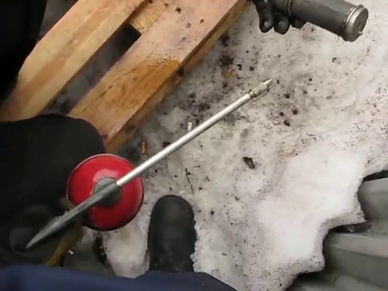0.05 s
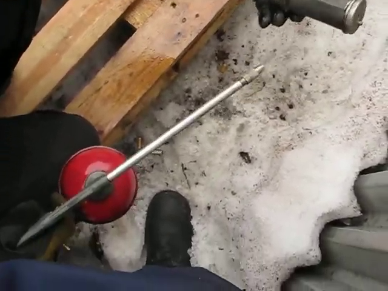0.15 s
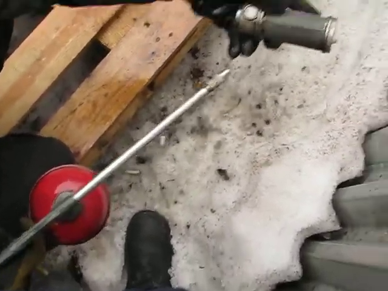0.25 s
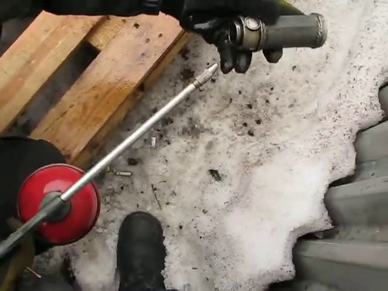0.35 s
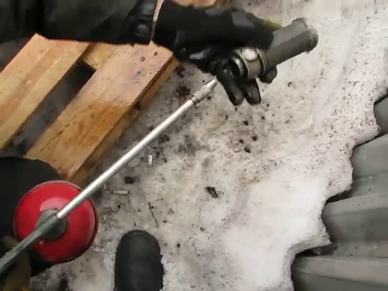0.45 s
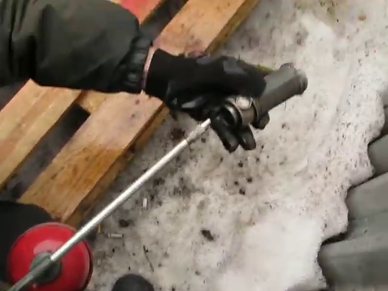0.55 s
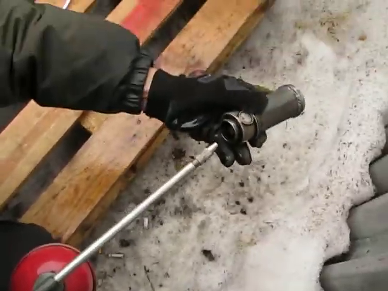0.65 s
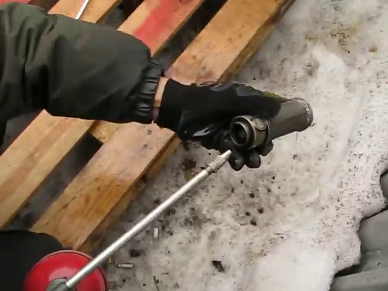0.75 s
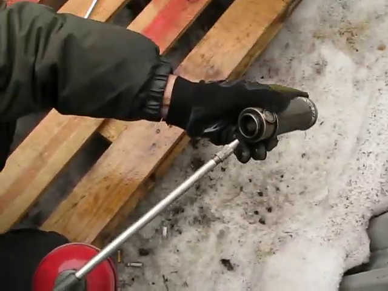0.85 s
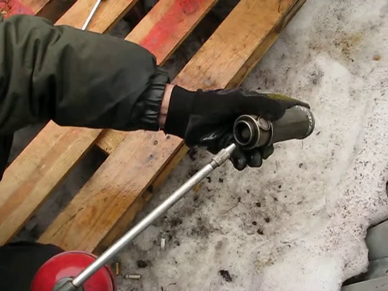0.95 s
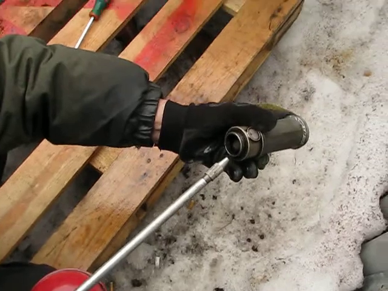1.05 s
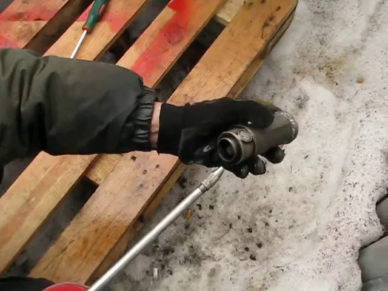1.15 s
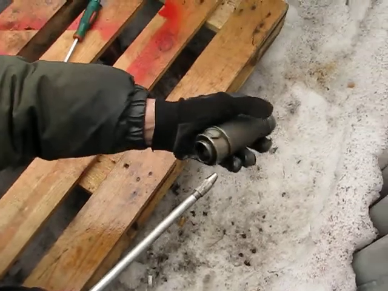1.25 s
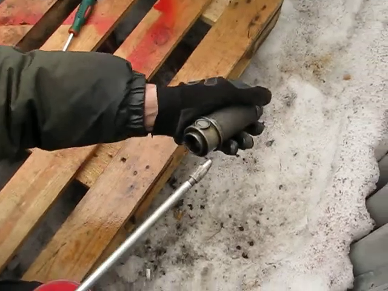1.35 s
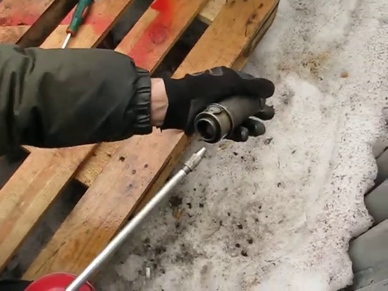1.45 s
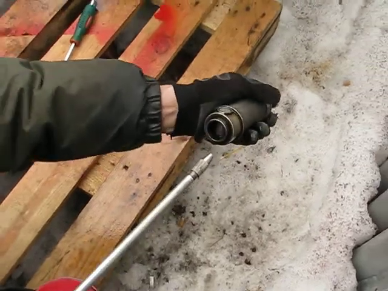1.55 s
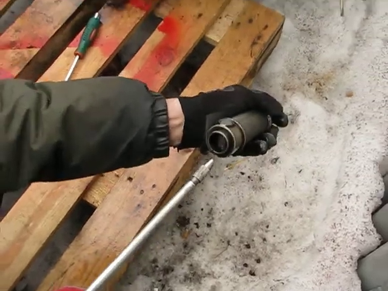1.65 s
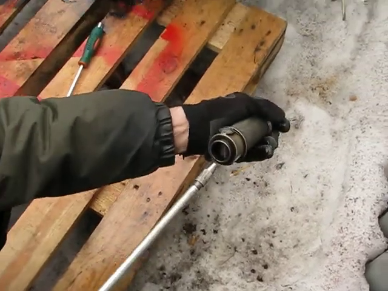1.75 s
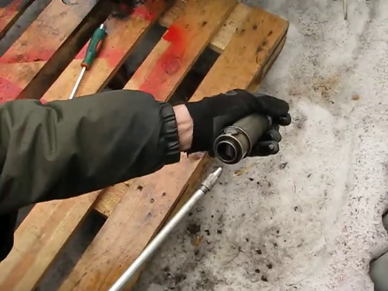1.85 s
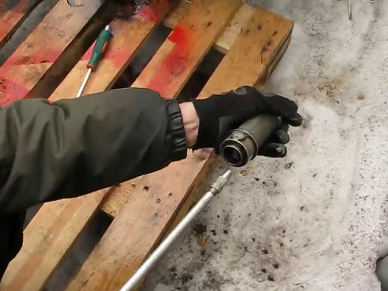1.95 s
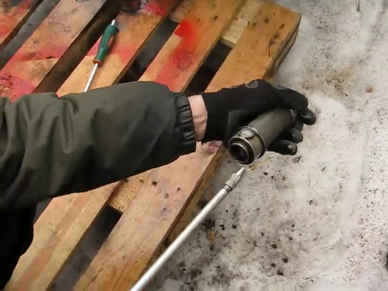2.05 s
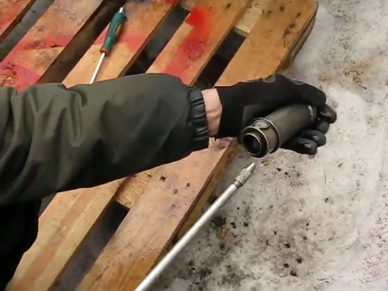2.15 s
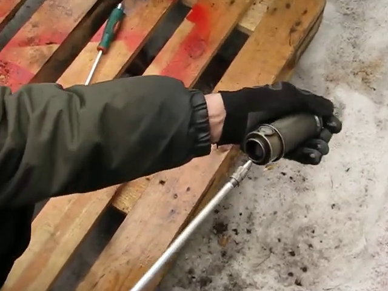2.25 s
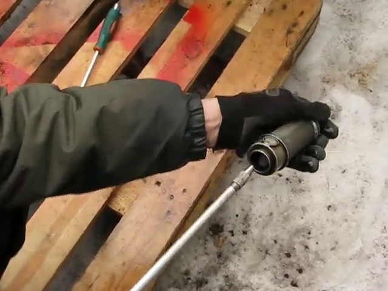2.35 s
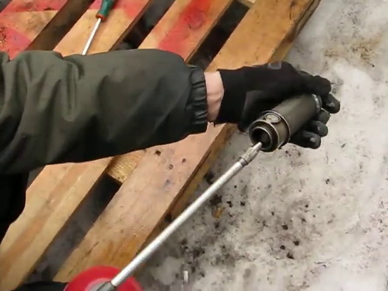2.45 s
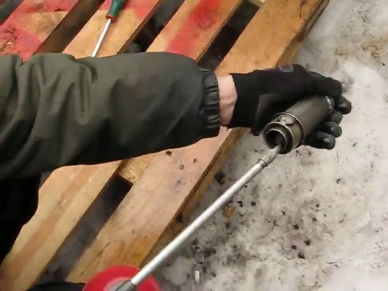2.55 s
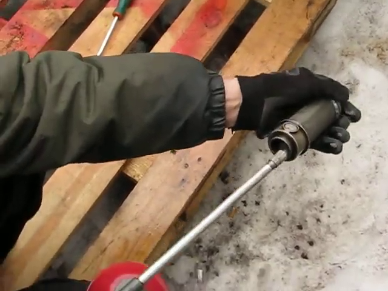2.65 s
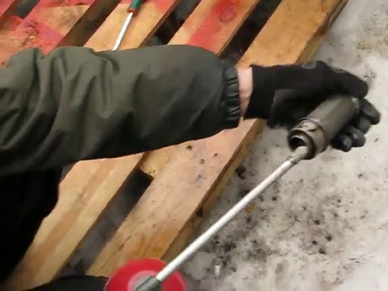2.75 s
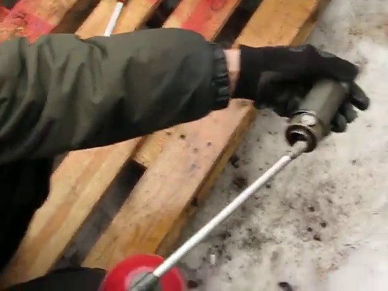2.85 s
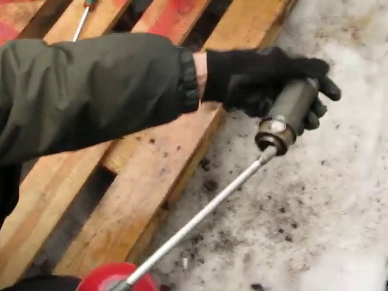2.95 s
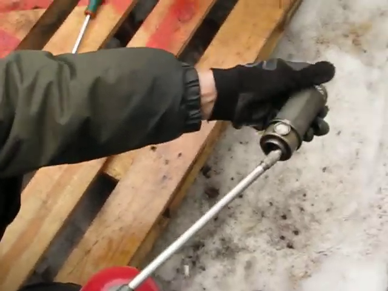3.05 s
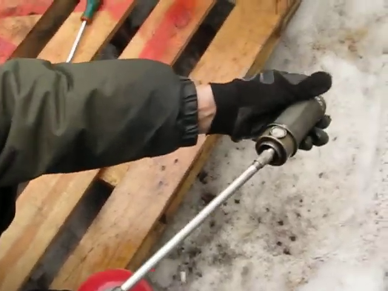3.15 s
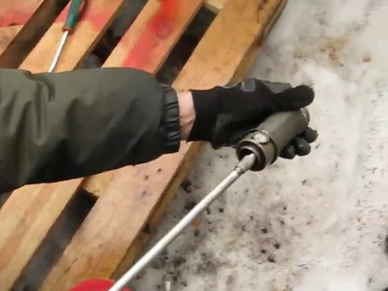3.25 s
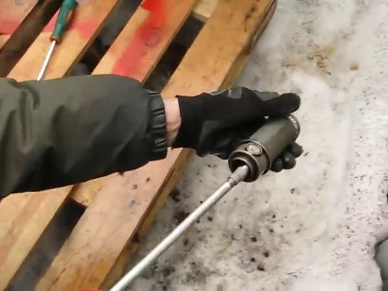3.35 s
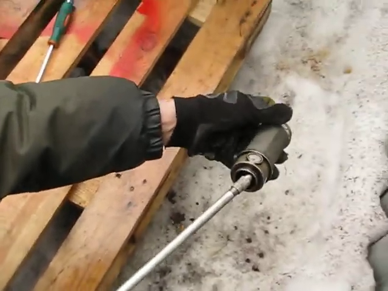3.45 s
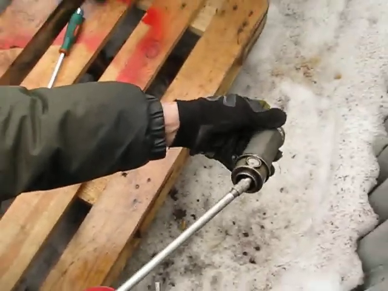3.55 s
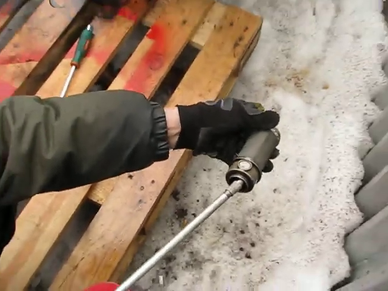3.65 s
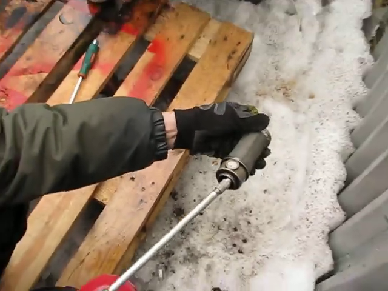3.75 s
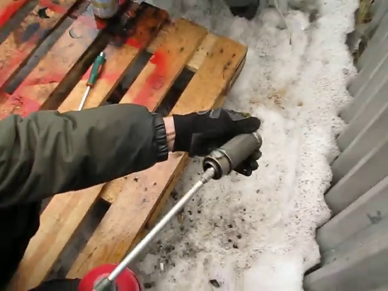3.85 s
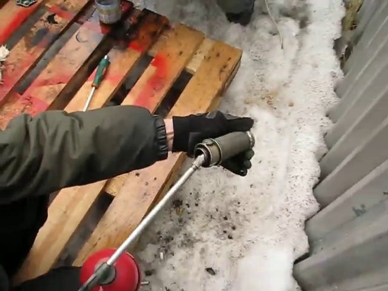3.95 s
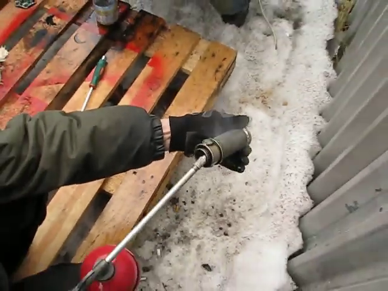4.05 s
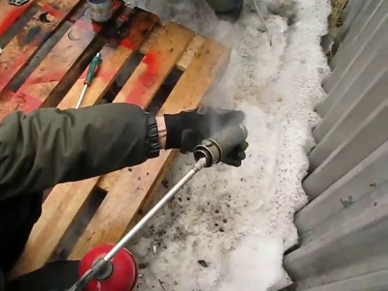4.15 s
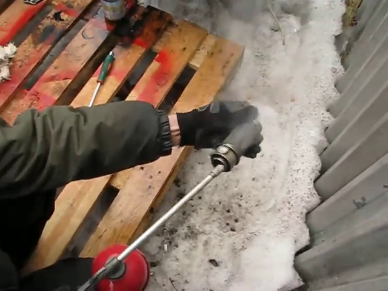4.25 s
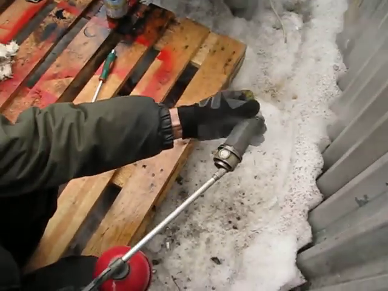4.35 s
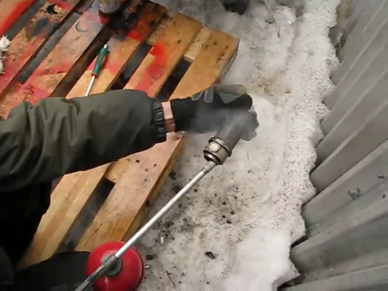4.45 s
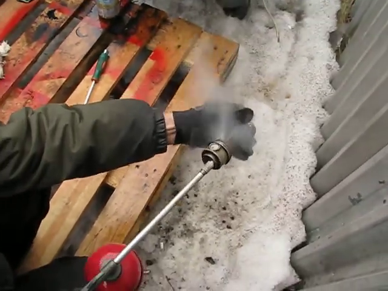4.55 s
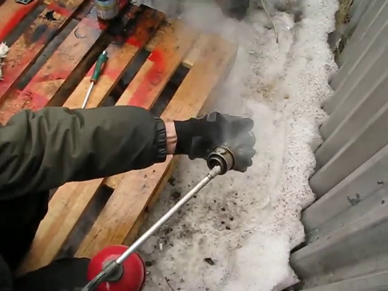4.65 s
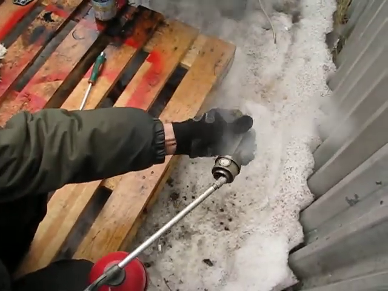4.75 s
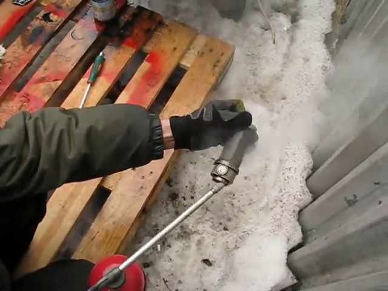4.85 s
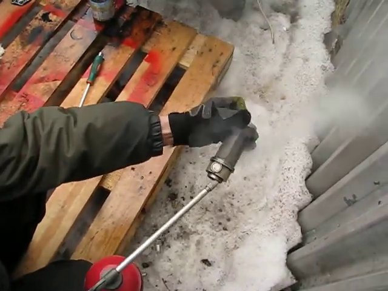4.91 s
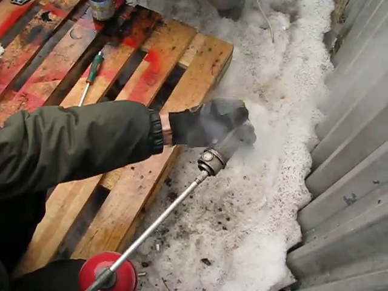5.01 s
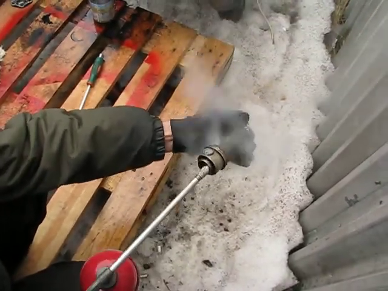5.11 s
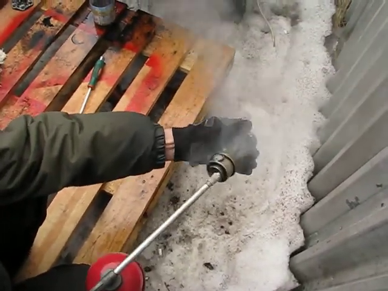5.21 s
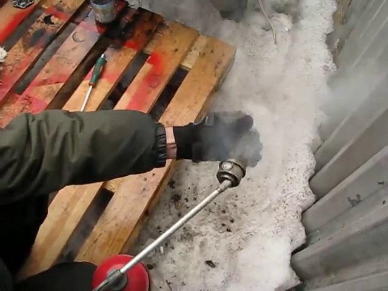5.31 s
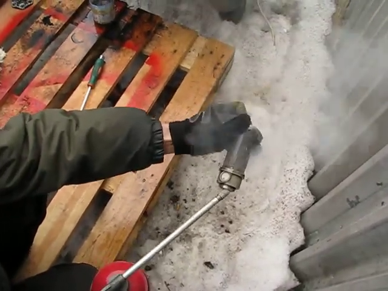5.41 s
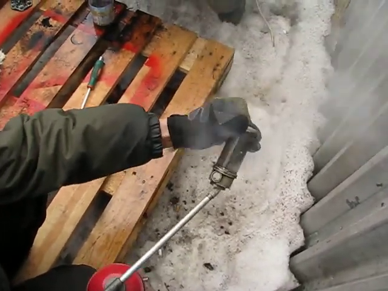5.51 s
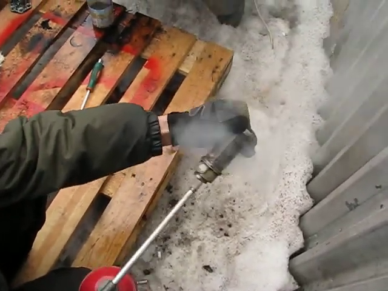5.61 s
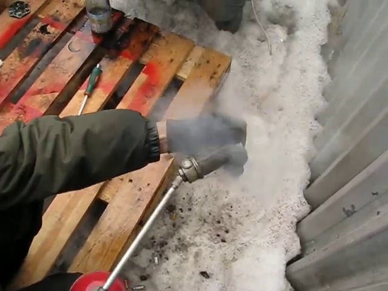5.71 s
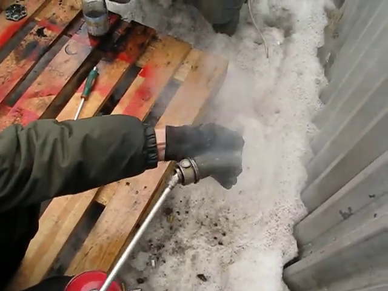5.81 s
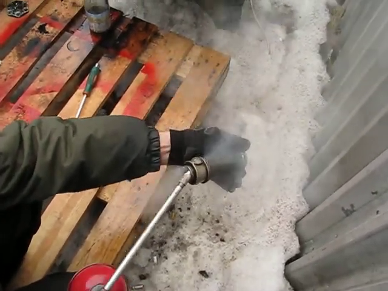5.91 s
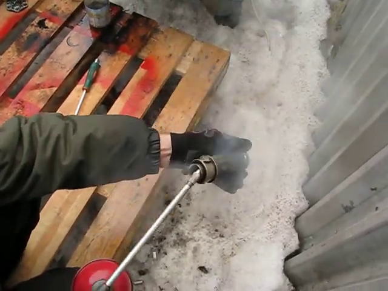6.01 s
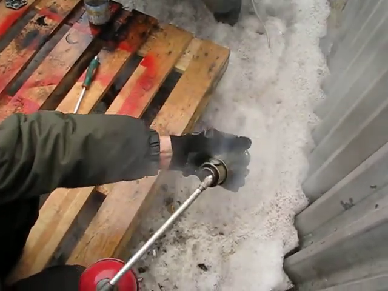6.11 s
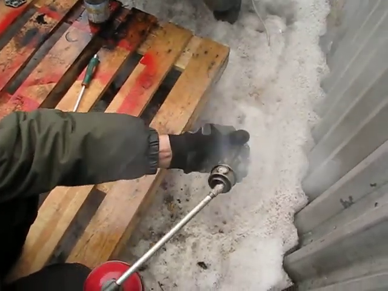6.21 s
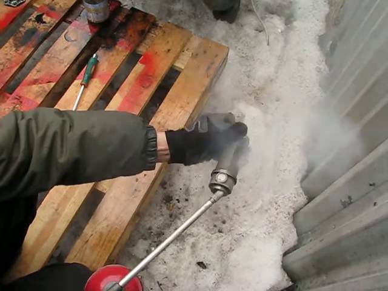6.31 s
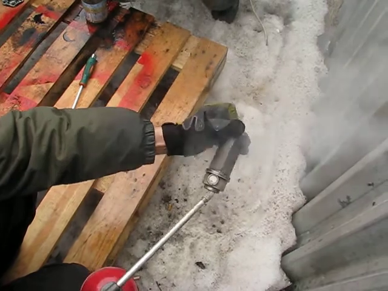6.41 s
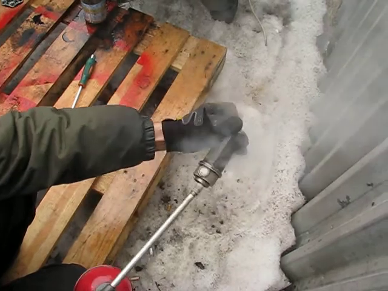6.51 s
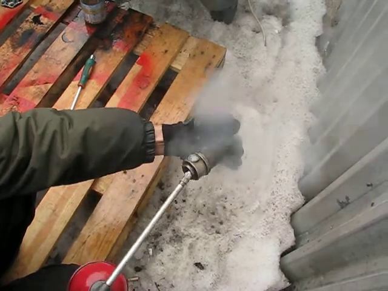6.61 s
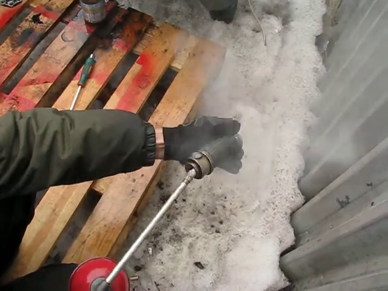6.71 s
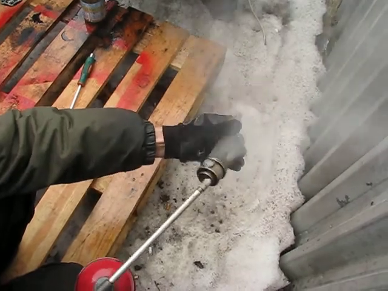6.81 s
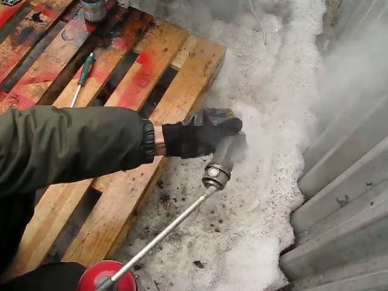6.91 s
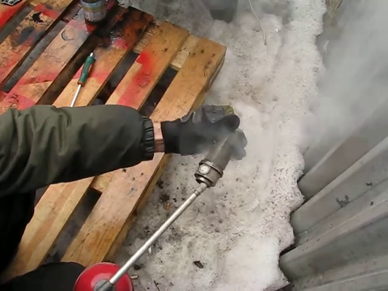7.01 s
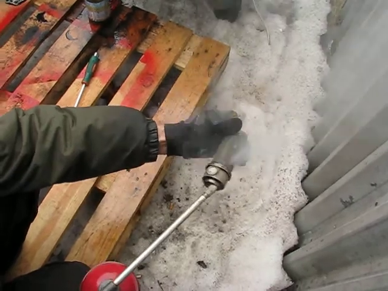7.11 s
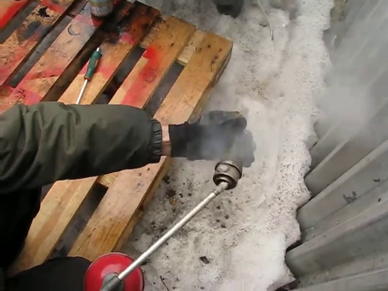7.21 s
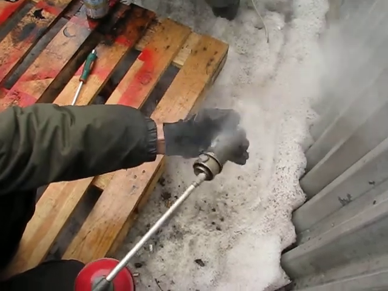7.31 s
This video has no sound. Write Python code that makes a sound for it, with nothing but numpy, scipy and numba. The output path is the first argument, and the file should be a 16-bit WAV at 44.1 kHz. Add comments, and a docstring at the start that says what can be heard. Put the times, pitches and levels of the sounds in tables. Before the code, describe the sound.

Gloved handling knocks and scrapes a hollow metal filter over a faint chugging machine, then a loud pressurised spray hisses in shifting, ringing passes.

```python
"""Outdoors, a far machine chugs over a distant roar and hum, and the background level rises over the first
seconds. A gloved hand fits a spray wand into a hollow metal filter: dragged grains rub, decaying modes knock,
grit scrapes. At 4 s the valve opens: shaped noise hisses and the background level drops under it. Pass after
pass, as the filter is turned, the stream fills the cavity until drifting resonances ring, then slips off the
rim."""
import sys
import numpy as np
from scipy import signal
from scipy.fft import rfft, irfft
from scipy.io import wavfile
from scipy.ndimage import uniform_filter1d, map_coordinates
from numba import njit

SR = 44100
rng = np.random.default_rng(int(sys.argv[2]) if len(sys.argv) > 2 else 0)


def master_out(mix):
    """Clip the mix to full scale and print it as 16-bit PCM to the path in sys.argv[1]."""
    frames = np.transpose(np.atleast_2d(mix))
    ceiling = np.clip(frames, -1, 1)
    pcm = np.round(ceiling * 32767).astype(np.int16)
    wavfile.write(sys.argv[1], SR, pcm)


N = 325017

# Tone of the distant roar: pitch_hz, density_db (per Hz, relative)
ROAR_SPECTRUM = [(15, -31), (25, -9.5), (64, -3), (256, -5.5), (840, 0), (1020, 1), (1650, -4.5),
                 (1940, -7), (3720, -23), (4490, -22), (7310, -21.5), (8140, -29), (14800, -36),
                 (16000, -36)]
# Level of the yard before the jet, ahead of a 3 dB lift of the roar: time_s, level_db
YARD_LEVEL = [(0.0, -61), (0.3, -58.5), (1.3, -53.5), (2.1, -48.5), (2.16, -54), (2.5, -50), (3.06, -48),
              (3.7, -47), (4.01, -43.5)]
# Likeness of the two ports for the yard: pitch_hz, likeness (0-1)
YARD_LIKENESS = [(60, 0.99), (130, 1), (290, 0.94), (640, 0.89), (1410, 0.67), (3100, 0.33), (6820, 0.25),
                 (15000, 0.36)]
# Tone of sleeves rustling: pitch_hz, density_db (per Hz, relative)
RUSTLE_SPECTRUM = [(1500, -2), (3500, 6), (6500, 0), (11000, -2), (16500, -7.5)]
# Level of the hum, rising and then dropping: time_s, level_db
HUM_LEVEL = [(0, -75), (.74, -72), (.93, -67), (1.45, -63), (1.68, -64), (2.06, -58), (2.2, -75),
             (2.34, -60), (3.1, -61), (4.0, -55), (4.08, -76)]
# Tone of the machine's puffs: pitch_hz, density_db (per Hz, relative)
CHUG_SPECTRUM = [(300, -6), (1200, -1.5), (2100, -2), (2500, -0.5), (3100, -2), (3600, -5.5), (4300, -5),
                 (5200, -29), (7000, -35)]
# Small ticks in each stroke: delay_s, pitch_hz, width_hz, level_db (relative to the stroke)
STROKE_TICKS = [(0.001, 4500, 350, 3), (.019, 3200, 400, 2)]
# Glove and sleeve dragging over metal and cloth: start_s, end_s, level_db, centre_hz
RUB_EVENTS = [(0, 0.06, -59.5, 7000), (0.084, 0.188, -53.5, 7500), (0.599, 0.793, -62, 7000),
              (1.1, 1.17, -55.5, 7000), (1.252, 1.344, -56.5, 6960), (1.435, 1.663, -53.5, 6470),
              (1.74, 1.84, -62, 4000), (1.818, 1.877, -45, 5060), (1.866, 1.932, -43.5, 5600),
              (1.961, 2, -47.5, 5000), (2.305, 2.37, -56.5, 3500), (2.554, 2.607, -43.5, 3830),
              (2.615, 2.662, -53, 3300), (2.923, 3.087, -57.5, 6500), (3.145, 3.184, -46, 4500),
              (3.188, 3.237, -49.5, 5000), (3.349, 3.426, -55, 6500), (3.435, 3.536, -52, 7300),
              (3.84, 3.886, -45.5, 7000)]
# Modes of the metal filter when knocked: pitch_hz, level_db (relative)
FILTER_MODES = [(250, -18), (440, -8), (640, 0.5), (800, -0.5), (950, -3.5), (1180, 3.5), (1300, 0),
                (1500, 1.5), (1900, -2), (2270, 1.5), (2600, 1), (3100, -2.5), (3800, -3), (4600, -2)]
# Metal on metal in a damping glove: start_s, peak_db (before pan), centre_hz, focus_db_per_octave,
# pan_db (left minus right)
KNOCK_EVENTS = [(.5645, -27.5, 1000, 1, -8), (0.584, -30, 900, 7, -3), (.63, -29, 1880, 22, 2),
                (.665, -38, 1200, 8, -6), (1.932, -12.5, 2265, 29, -3), (1.935, -29, 640, 23, 0),
                (1.98, -23, 2210, 7, -3), (2.034, -22, 2620, 8, -3), (2.1122, -10.5, 1130, 7, -4),
                (2.118, -7, 1474, 8.5, -10), (2.119, -11, 780, 11.5, -12.5), (2.126, -15, 1000, 6, -11),
                (2.257, -30.5, 1620, 1, -1.5), (2.373, -27.5, 662, 38, 1), (2.375, -32.5, 2260, 29, -3),
                (2.615, -40, 255, 29, -.8), (2.75, -27.5, 686, 10, -3), (2.763, -20.5, 1196, 5, -6),
                (2.897, -17.5, 1105, -0.5, -8), (3.116, -12.5, 1180, 12, -6.5), (3.116, -16, 2390, 18, -1),
                (3.15, -39, 248, 22, 1), (3.155, -21, 1258, 7, -5), (3.196, -24, 3000, 2.5, -4),
                (3.342, -39, 2600, 20, 3), (3.414, -31, 2700, 14, 6), (3.926, -21.5, 1150, 8, -3),
                (3.927, -28, 3030, 27, 0)]
# Gritty scrapes and ticks: start_s, peak_db (before pan), centre_hz, pan_db (left minus right)
SCRAPE_EVENTS = [(0.5641, -40, 3510, -6), (0.604, -44, 4620, 2.5), (0.629, -29.5, 4900, 7),
                 (.648, -35, 9500, 0.1), (1.9308, -14, 4370, 0), (1.9814, -29, 3560, 4),
                 (2.0342, -23, 3800, 0), (2.0694, -34, 4400, 0.1), (2.116, -16.5, 4000, -4),
                 (2.15, -35, 4800, 1.1), (2.372, -29.5, 3300, 2.1), (2.5446, -12, 4500, 2.1),
                 (2.5527, -13.5, 4370, -4), (2.6047, -18, 3200, -1), (2.6143, -24, 4600, 5),
                 (2.7627, -36, 3400, -8), (2.898, -33, 3270, -10), (3.1156, -29, 3150, -8),
                 (3.144, -23, 4210, 0.1), (3.154, -18, 2600, 0), (3.192, -29, 3000, -3),
                 (3.853, -23.5, 7470, -0.4), (3.927, -24, 3000, -2.1)]
# Tone of the free jet: pitch_hz, density_db (per Hz, relative)
HISS_SPECTRUM = [(900, -35), (2000, -7.5), (4000, -1), (7000, 2.5), (11000, 1.5), (14000, 3), (15900, -2.1)]
# Tone of the stream's wash: pitch_hz, density_db (per Hz, relative)
WASH_SPECTRUM = [(24, -60), (40, -27), (261, -7.5), (378, -5.5), (407, -5.5), (445, -4.5), (565, -3.5),
                 (870, -3), (1400, -3.5), (1820, -11), (3080, -120)]
# Resonances of the blown filter: pitch_hz, width_hz (nominal), level_db (relative)
LOW_CAVITY_MODES = [(1716, 530, -3), (2627, 630, 1), (3155, 490, -5.5)]
MID_CAVITY_MODES = [(3537, 82, -2), (4234, 460, 9.5), (5280, 250, -5)]
NOZZLE_MODES = [(6420, 2000, -6.5), (7340, 880, 6.5), (8280, 560, 3.5), (8750, 250, 0.5),
                (13200, 1000, -30)]
# Likeness of the two ports for the jet: pitch_hz, likeness (0-1)
JET_LIKENESS = [(100, 0.07), (640, 0.1), (1400, 0.41), (3100, 0.67), (5000, 0.65), (8000, 0.47),
                (11000, 0.34), (15000, 1)]
# Balance of the jet: pitch_hz, pan_db (left minus right)
JET_BALANCE = [(60, 0), (110, 1), (200, 0.5), (380, -1.5), (700, 0), (1290, -1), (2380, -2), (4400, -0.5),
               (8120, -0.5), (15000, 0)]
# Echoes of the hiss off pallet, ground and fence: delay_ms, drift_ms (as the hands move), level_db
HISS_ECHOES = [(.5, 0.066, -5.5), (1.3, 0.11, -6.5), (3.1, .25, -3)]
# Passes of the stream over the filter: low_fullest_s, mid_fullest_s, jet_db, then relative to jet_db
# and ahead of fixed trims wash_db, low_db, mid_db (cavities at fullest), nozzle_db;
# nozzle_end (pitch ratio at the end of the pass)
STREAM_PASSES = [(4.309, 4.22, -21.5, -11, -0.5, -4, -1, 0.99),
                 (4.88, 4.72, -21.5, -14, 0.5, -2.3, -0.1, 1.08),
                 (5.42, 5.36, -22, -12.5, 0.3, -2.5, 2.1, 1.04),
                 (5.77, 5.75, -21.5, -14, -2.1, -3, 3, 1.14),
                 (6.39, 6.21, -21.5, -17, -1, -2.2, -1.3, 1.08),
                 (6.97, 6.9, -21.5, -12.5, 0.3, -2.5, 1, 1.06),
                 (7.11, 7.12, -21.5, -11.5, -3, -9, -0.5, 1.26),
                 (7.31, 7.3, -20.5, -12.5, -2.2, -7, -1.5, 1.1)]
# The stream slips off the rim between passes: leaves_s, off_s,
# return_s (may overlap off_s where the slip is brief), wash_loss_db (negative)
RIM_SLIPS = [(4.375, 4.477, 4.4, -4.5), (4.933, 4.99, 5.1, -6.5), (5.433, 5.477, 5.7, -12),
             (5.8, 5.907, 5.94, -11), (6.407, 6.53, 6.58, -17), (7.014, 7.023, 7.045, -7),
             (7.168, 7.216, 7.17, -6)]

HUM_HZ, HUM_WAVER_DB, DRONE_HZ, DRONE_DB = 51.5, 2.2, 235, -4.5
UNDER_JET_DB = -61.5  # yard level once the valve is open, ahead of the roar's lift
RUSTLE_DB, RUSTLE_RISE = -61, 0.25  # at the start; dB per dB of yard swell

CHUG_COUNT, CHUG_FIRST_S, CHUG_PERIOD_S = 13, .044, .1384
CHUG_LIMP_S = .011  # every fourth stroke is late
CHUG_DB, CHUG_SLOPE_DB_PER_S, CHUG_SCATTER_DB = 10.5, -4, 1.5  # relative to the rising yard level
CHUG_DECAY_S, TICK_DECAY_S = 0.053, .006
CHUG_BED_DB, CHUG_BED_FADE_S = -3.5, 0.55  # hiss between strokes, growing to the last and then dying

RUB_WIDTH = 2.05  # in centres at 6 kHz, narrower for duller rubs
KNOCK_T60_S, T60_PER_FOCUS_S = 0.028, 0.00058  # at 1 kHz; a purer blow is gripped less and rings longer
CONTACT_MS, SOFT_HZ = 1, 900  # blows centred under SOFT_HZ are padded, longer pushes
SCRAPE_WIDTH, SCRAPE_T60_S = 2.04, 0.041  # width in centres at 4.5 kHz, narrower for duller grit

VALVE_S, VALVE_RISE_S, SPURT_DB, SPURT_S = 4.0228, .0025, 4.5, .01
PORT_LAG_MS, PORT_DRIFT_MS = .006, .011
RETURN_DB_PER_S = 121
HISS_LOSS = 0.24  # dB lost by the whole jet per dB of lost wash
LOW_LOSS, MID_LOSS, NOZZLE_LOSS = 0.05, 1, 0.55  # on top of that, per dB of lost wash
LOW_SWELL_DB, LOW_RISE_S, LOW_FALL_S = 7, .12, 0.056
MID_SWELL_DB, MID_RISE_S, MID_FALL_S = 3.5, 0.13, 0.16
NOZZLE_FADE_DB = -3  # over one pass
MID_SHARP, MID_SAG = .02, 0.052  # pitch ratios; the middle cavity sags as the low one swells
TOP_HZ = 15750


def undb(db):
    """Decibels to amplitude."""
    return 10 ** (np.asarray(db) / 20)


def unit(x):
    """Scale to rms 1."""
    return x / np.sqrt(np.mean(x ** 2))


def on_hz(table, hz):
    """A (pitch_hz, value) table read on a log-frequency axis."""
    f, v = np.transpose(table)
    return np.interp(np.log(np.maximum(hz, 1)), np.log(np.maximum(f, 1)), v)


def in_time(table):
    """A (time_s, level_db) curve, one value per sample."""
    s, level = np.transpose(table)
    return np.interp(np.arange(N) / SR, s, level)


def walk(rate):
    """Random levels held 1 / rate s and slewed twice; spread near 1."""
    k = int(SR / rate)
    steps = np.repeat(rng.standard_normal(N // k + 1), k)
    return 1.567 * uniform_filter1d(uniform_filter1d(steps, k), k)[:N]


@njit
def svf(x, hz, width):
    """State-variable band-pass with a moving centre, gain 1 there."""
    y, band, low = np.empty(len(x)), 0., 0.
    for i in range(len(x)):
        g, k = np.tan(np.pi * hz[i] / SR), width / hz[i]
        v = (band + g * (x[i] - low)) / (1 + g * (g + k))
        band, low, y[i] = 2 * v - band, low + 2 * g * v, k * v
    return y


def steep_band(x, hz, width):
    """Two band-passes in a row on each channel."""
    return np.array([svf(svf(c, hz, width), hz, width) for c in x])


def pair(alike, pan=((1, 0), (2, 0))):
    """White noise for two microphone ports, with their likeness and balance by frequency."""
    hz = np.arange(N // 2 + 1) * SR / N
    likeness = np.clip(on_hz(alike, hz), 0, 1)
    mid, side = rfft(rng.standard_normal((2, N))) * np.sqrt([1 + likeness, 1 - likeness])
    skew = undb(on_hz(pan, hz) / 2)
    return irfft([(mid + side) * skew, (mid - side) / skew], N)


def colour(x, spectrum):
    """Shape by a (pitch_hz, density_db) spectrum; rms 1."""
    gain = undb(on_hz(spectrum, np.arange(N // 2 + 1) * SR / N))
    return unit(irfft(rfft(x) * gain, N))


def chugs():
    """The machine's regular noise puffs, losing ground to the roar stroke by stroke, each with two ticks."""
    k = np.arange(CHUG_COUNT)
    starts = CHUG_FIRST_S + CHUG_PERIOD_S * k + CHUG_LIMP_S * (k % 4 == 3)
    t = np.arange(N) / SR
    scatter = CHUG_SCATTER_DB * rng.standard_normal(CHUG_COUNT)
    size = undb(CHUG_DB + CHUG_SLOPE_DB_PER_S * starts + scatter)

    def strokes(after_s, decay_s):
        """Envelope of all strokes: quick rise, exponential decay."""
        since = np.maximum(t - starts[:, None] - after_s, 0)
        return size @ ((1 - np.exp(-since / 0.003)) * np.exp(-since / decay_s))

    bed_fade = np.exp(-np.maximum(t - starts[-1], 0) / CHUG_BED_FADE_S)
    bed = undb(CHUG_BED_DB) * np.minimum(t / starts[-1], 1) * bed_fade
    out = (strokes(0, CHUG_DECAY_S) + bed) * colour(pair(YARD_LIKENESS), CHUG_SPECTRUM)
    for after_s, hz, width, db in STROKE_TICKS:
        tone = np.array([svf(c, np.full(N, hz * 1.), width * 1.) for c in pair(YARD_LIKENESS)])
        out += undb(db) * strokes(after_s, TICK_DECAY_S) * unit(tone)
    return out


def hum():
    """The machine's low tone and a higher drone, both wandering in phase and wavering in level together."""
    t = np.arange(N) / SR
    low = np.sin(2 * np.pi * HUM_HZ * t + 0.5 * walk(3.05))
    drone = undb(DRONE_DB) * np.sin(2 * np.pi * DRONE_HZ * t + 1.3 * walk(9.2))
    return unit(low + drone) * undb(in_time(HUM_LEVEL) + HUM_WAVER_DB * walk(6.6))


def rustle(risen_db):
    """Sleeves close by: bright flickering noise that grows a little with the yard."""
    level = undb(RUSTLE_DB + RUSTLE_RISE * risen_db + 1.05 * walk(40.5))
    return colour(pair(YARD_LIKENESS), RUSTLE_SPECTRUM) * level


def yard():
    """Distant roar and chugs that sink as the valve opens, where the rustle stops; hum on its own curve."""
    level_db = in_time(YARD_LEVEL)
    before_jet = uniform_filter1d((np.arange(N) / SR < VALVE_S) * 1., size=400)
    roar = colour(pair(YARD_LIKENESS), ROAR_SPECTRUM) * undb(3.0 + 1.16 * walk(13))
    level = before_jet * undb(level_db) + (1 - before_jet) * undb(UNDER_JET_DB)
    return (roar + chugs()) * level + before_jet * rustle(level_db - level_db[0]) + hum()


def rubs():
    """Dragging: band-passed noise broken into grains that swells and fades."""
    out = np.zeros((2, N))
    for start, end, db, hz in RUB_EVENTS:
        i, n = int(start * SR), int((end - start) * SR)
        grains = undb(3.5 * np.repeat(rng.standard_normal(n // 100 + 1), 100)[:n])
        noise = rng.standard_normal((3, n))
        noise = (0.57 * noise[0] + noise[1:]) * grains * np.hanning(n) ** 0.31  # part shared by both sides
        width = RUB_WIDTH * hz / 6000 * hz
        out[:, i:i + n] += undb(db) * unit(steep_band(noise, np.full(n, hz * 1.), width))
    return out


def add(out, s, burst, db, pan_db):
    """Place a two-channel burst at its peak level, split by pan."""
    i = int(s * SR)
    gain = undb(db + np.array([[pan_db], [-pan_db]]) / 2)
    out[:, i:i + burst.shape[1]] += burst / np.abs(burst).max() * gain


def scrapes():
    """Decaying grit: band-passed noise with a snap at first contact."""
    out, t = np.zeros((2, N)), np.arange(SR // 4) / SR
    snap = 1 + 1.6 * np.exp(-t / 0.00085)
    fade = np.exp(-np.log(1000) * t / SCRAPE_T60_S) * np.minimum(t / 0.00026, 1)
    for s, db, hz, pan_db in SCRAPE_EVENTS:
        grit = rng.standard_normal((3, len(t)))
        grit = (grit[0] + 2.2 * grit[1:]) * snap * fade
        width = SCRAPE_WIDTH * hz * min(hz / 4500, 1.1)
        add(out, s + 0.000923, steep_band(grit, np.full(len(t), hz * 1.), width), db, pan_db)
    return out


def knocks():
    """Blows ring the filter's modes, favouring those near the blow's centre; higher modes die sooner."""
    out, t = np.zeros((2, N)), np.arange(SR // 4) / SR
    mode_hz, mode_db = np.transpose(FILTER_MODES)
    for s, db, hz, focus_db, pan_db in KNOCK_EVENTS:
        t60 = KNOCK_T60_S + T60_PER_FOCUS_S * focus_db
        contact_ms = CONTACT_MS * max(SOFT_HZ / hz, 1) ** 2.2
        chance = rng.standard_normal((4, len(mode_hz)))
        f = mode_hz * (1 + 0.029 * chance[1])
        f[np.argmin(np.abs(f - hz))] = hz  # the grip retunes the mode nearest the blow
        share = undb(mode_db + 1.5 * chance[0] - focus_db * np.abs(np.log2(f / hz)))
        decay = np.exp(-np.log(1000) * np.outer((f / 1000) ** .5, t) / t60)
        fade = decay * np.minimum(t * 1000 / contact_ms, 1)
        turn = 2 * np.pi * np.outer(f, t)
        burst = np.array([share @ (fade * np.sin(turn + 0.93 * c[:, None])) for c in chance[2:]])
        add(out, s, burst, db, pan_db)
    return out


def echoes(x):
    """Near surfaces return the hiss on shifting paths, another for each port: moving comb patches."""
    out = x.copy()
    for ms, drift_ms, db in HISS_ECHOES:
        shared = walk(8)
        for c in range(2):
            lag = (ms + drift_ms * (shared + .4 * walk(8))) * SR / 1000
            out[c] += undb(db) * np.interp(np.arange(N) - lag, np.arange(N), x[c])
    return unit(out)


def late(x, ms):
    """Read along a moving delay."""
    return map_coordinates(x, [np.arange(N) - ms * SR / 1000], order=3)


def ring(x, modes, pull, drift, flicker_db):
    """Noise in resonances whose centres follow the pull and wander, and whose strengths flicker alone."""
    out = 0
    for f, width, db in modes:
        hz = f * (pull + drift * walk(6))
        band = steep_band(x, hz, 1.29 * width)
        out = out + undb(db + flicker_db * walk(14)) * unit(band)
    return unit(out)


def swell(fullest, rise_s, fall_s):
    """0-1, a bell around each moment, with its own rise and fall."""
    away = np.arange(N) / SR - fullest[:, None]
    return np.exp(-(away / np.where(away < 0, rise_s, fall_s)) ** 2).max(axis=0)


def smooth(x):
    """Moving average over 2500 samples."""
    return uniform_filter1d(x, size=2500)


def passes():
    """Wash change in dB (negative off the rim), progress 0-1 through a pass, cavity swells 0-1, levels."""
    t = np.arange(N) / SR
    low_s, mid_s, *levels = np.transpose(STREAM_PASSES)
    leaves, off, back, _ = np.transpose(RIM_SLIPS)
    lost = sum(np.interp(t, [a, b, c, c - db / RETURN_DB_PER_S], [0, db, db, 0])
               for a, b, c, db in RIM_SLIPS)
    now = np.searchsorted((off + back) / 2, t)  # index of the current pass
    begun, ends = np.append(VALVE_S, back)[now], np.append(leaves, N / SR)[now]
    on_rim = t < np.append(off, N / SR)[now]
    progress = smooth(np.clip((t - begun) / (ends - begun), 0, 1) * on_rim)
    swells = swell(low_s, LOW_RISE_S, LOW_FALL_S), swell(mid_s, MID_RISE_S, MID_FALL_S)
    return uniform_filter1d(lost, size=900), progress, swells, [smooth(x[now]) for x in levels]


def valve():
    """The valve snaps open and the stored pressure overshoots."""
    t = np.maximum(np.arange(N) / SR - VALVE_S, 0)
    return np.minimum(t / VALVE_RISE_S, 1) * undb(SPURT_DB * np.exp(-t / SPURT_S))


def jet():
    """Free turbulence, plus what the stream excites where it strikes the turning filter."""
    lost, progress, (low_swell, mid_swell), levels = passes()
    jet_db, wash_db, low_db, mid_db, nozzle_db, nozzle_end = levels
    low_db = low_db + LOW_LOSS * lost - LOW_SWELL_DB * (1 - low_swell)
    mid_db = mid_db + MID_LOSS * lost - MID_SWELL_DB * (1 - mid_swell)
    nozzle_db = nozzle_db + NOZZLE_LOSS * lost + NOZZLE_FADE_DB * progress
    mid_pull = 1 + MID_SHARP - MID_SAG * low_swell
    nozzle_pull = 1 + (nozzle_end - 1) * np.abs(progress) ** 1.73

    sound = undb(6.5) * echoes(colour(pair(JET_LIKENESS, JET_BALANCE), HISS_SPECTRUM))
    wash = colour(pair(JET_LIKENESS, JET_BALANCE), WASH_SPECTRUM)
    wash = undb(wash_db + (1 - HISS_LOSS) * lost + 1.15 * walk(22)) * wash
    for modes, db, pull in ((LOW_CAVITY_MODES, low_db, 1),
                            (MID_CAVITY_MODES, mid_db, mid_pull),
                            (NOZZLE_MODES, nozzle_db, nozzle_pull)):
        sound += undb(db + 1.0) * ring(pair(JET_LIKENESS, JET_BALANCE), modes, pull, 0.026, 0.74)
    # a small wandering delay between the two ports loosens the treble image
    sound[0] = late(sound[0], PORT_LAG_MS + PORT_DRIFT_MS * walk(6))
    sputter_db = 0.55 * walk(60)  # droplets make the flow sputter
    return (sound + wash) * valve() * undb(jet_db + HISS_LOSS * lost + sputter_db)


def scene():
    """Yard, rubs, scrapes, knocks and jet, summed."""
    return yard() + rubs() + scrapes() + knocks() + jet()


def record(dry):
    """Clip at full scale, then cut the top with a steep low-pass."""
    low_pass = signal.ellip(14, .2, 95, TOP_HZ, fs=SR, output="sos")
    return signal.sosfilt(low_pass, np.clip(dry, -1, 1))


dry = scene()
out = record(dry)
master_out(out)
```